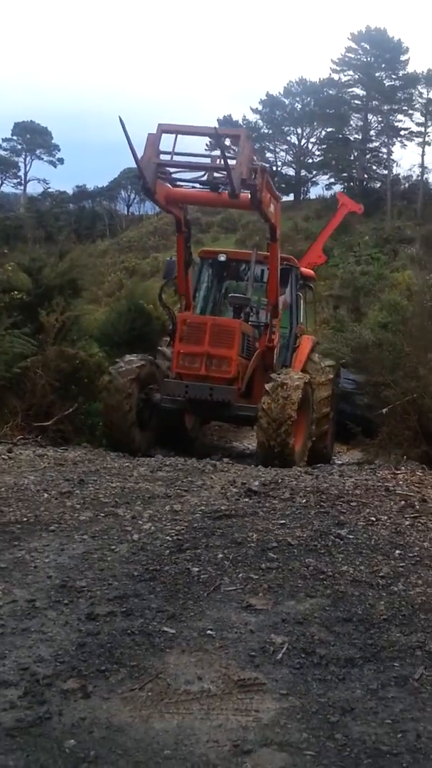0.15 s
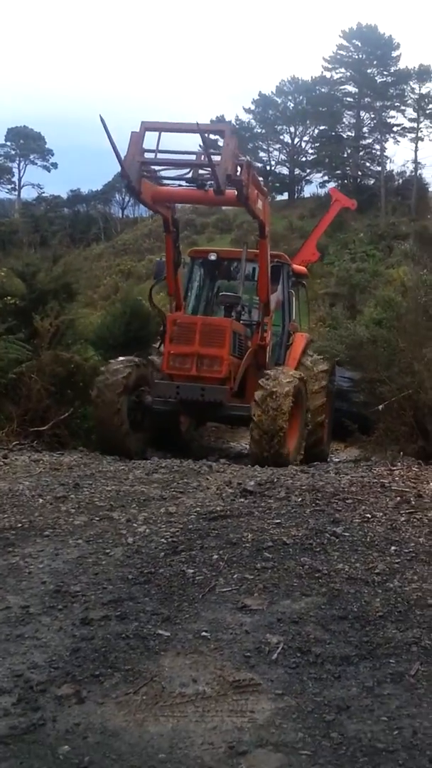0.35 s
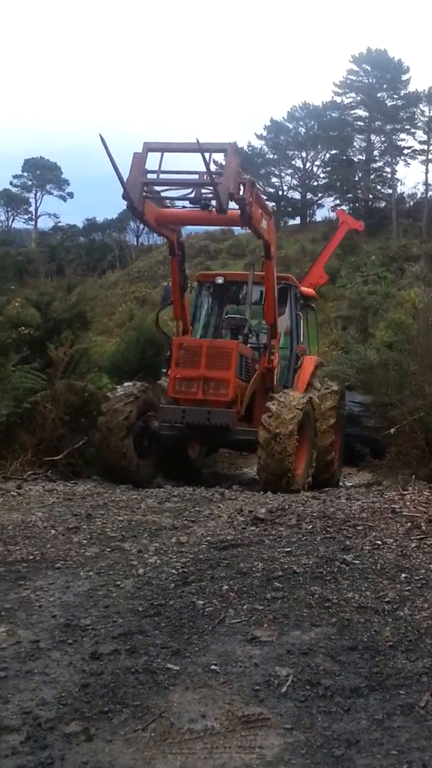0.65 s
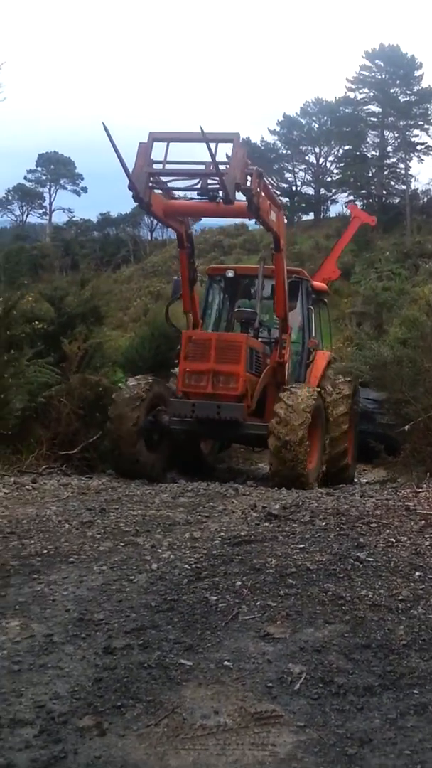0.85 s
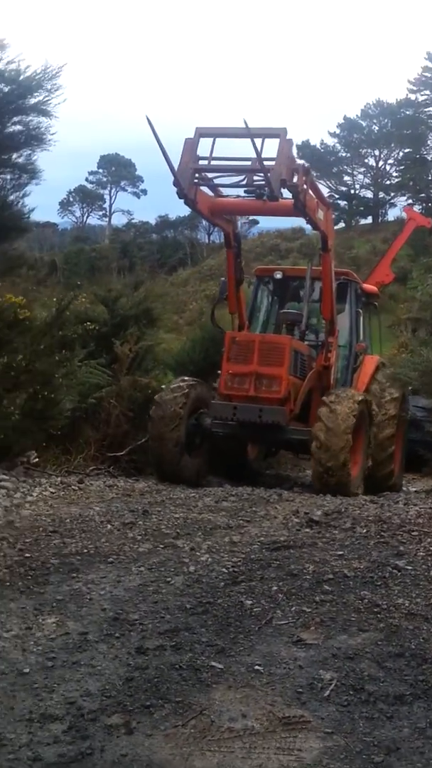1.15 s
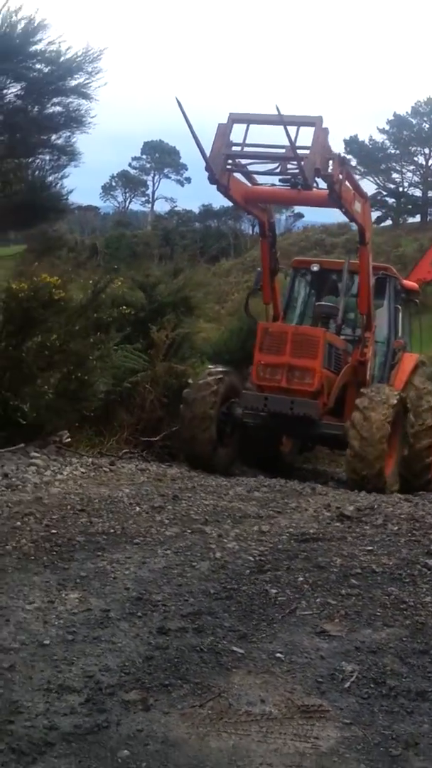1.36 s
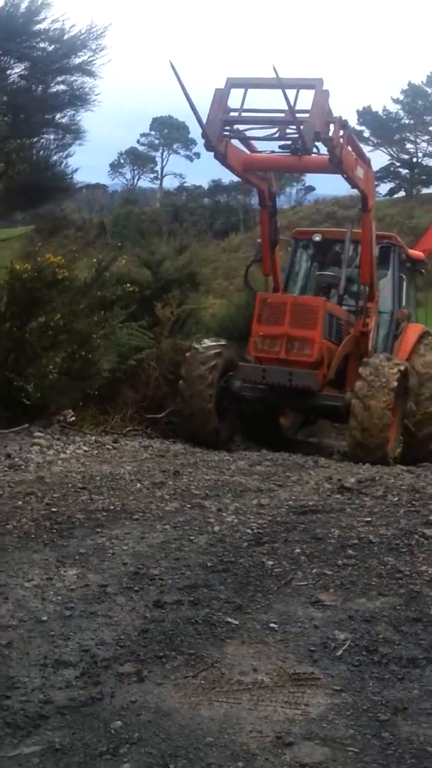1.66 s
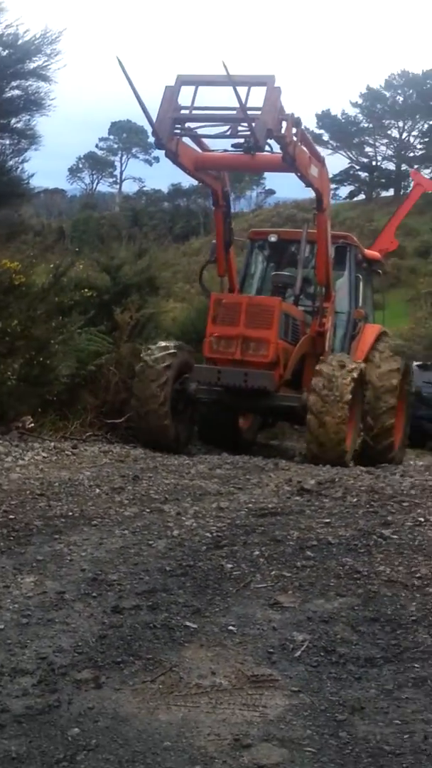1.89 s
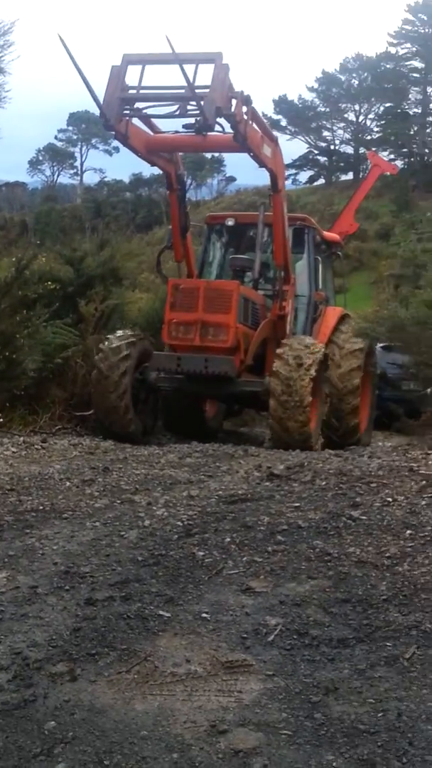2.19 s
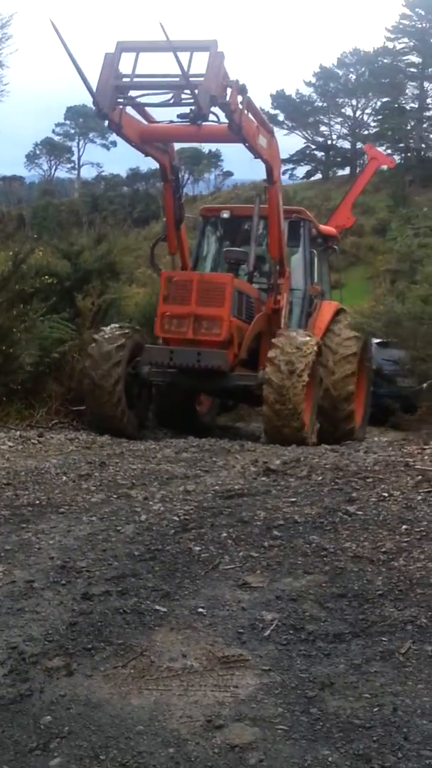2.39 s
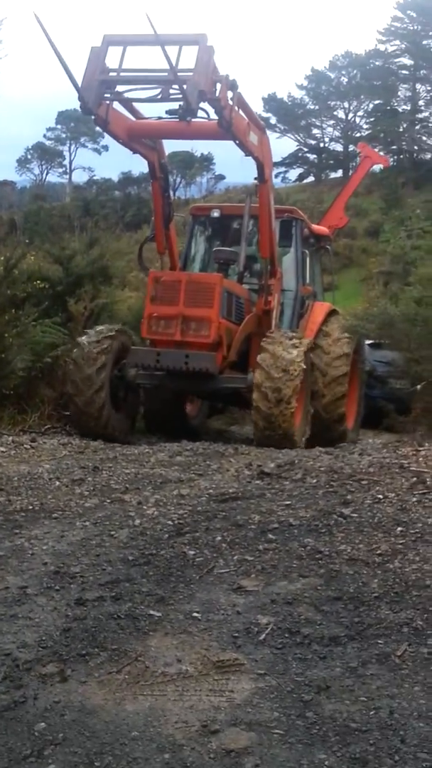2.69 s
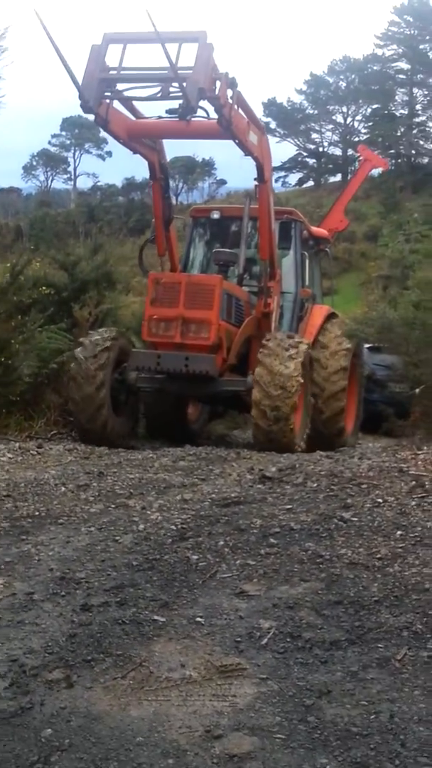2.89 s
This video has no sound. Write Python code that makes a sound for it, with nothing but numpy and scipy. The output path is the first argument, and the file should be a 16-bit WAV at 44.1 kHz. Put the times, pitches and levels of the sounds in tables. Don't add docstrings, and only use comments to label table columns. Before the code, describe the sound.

Continuous tractor engine rumble with fast, uneven chugging and metallic rattle, wavering slightly in strength but never revving up. One tiny dry click near the start; outdoors, dry, picked up by a small stereo device.

```python
import sys
import numpy as np
from scipy import signal
from scipy.fft import rfft, irfft, next_fast_len
from scipy.io import wavfile
from scipy.ndimage import uniform_filter1d

SR = 44100
rng = np.random.default_rng(int(sys.argv[2]) if len(sys.argv) > 2 else 0)


def transcribe(u):
    v = np.clip(np.atleast_2d(u).T, -1, 1)
    q = np.round(v * 32767).astype(np.int16)
    wavfile.write(sys.argv[1], SR, q)


def natural_amplitude(level_db):
    exponent = np.asarray(level_db, float) / 20
    return 10 ** exponent


N = 134064

# t/s, cycle rate f/Hz
CYCLE_RATE = [(0.0, 10.344), (0.234, 10.407), (0.468, 10.547), (0.702, 10.244), (0.935, 10.094),
              (1.169, 10.019), (1.403, 9.983), (1.637, 10.143), (1.871, 10.069), (2.105, 10.13),
              (2.338, 10.225), (2.572, 10.115), (2.806, 10.129), (3.04, 10.345)]
# t/s, level/dB
LOAD = [(0.0, -28), (0.27, -26), (0.51, -28.5), (0.97, -27), (1.11, -31), (1.24, -26), (1.42, -31),
        (1.45, -22.5), (1.5, -30), (1.54, -23), (1.62, -30.5), (2.16, -28.5), (2.36, -25.5), (2.37, -28),
        (2.45, -26), (2.52, -34.5), (2.53, -26.5), (3.04, -25.5)]
# t/s, level/dB
FUELLING = [(0, 1), (.15, 1.5), (.4, 3.5), (.55, -0.5), (.72, 0.5), (.84, 0.5), (.97, 1.5), (1.13, -2.5),
            (1.3, 1.2), (1.43, -1), (1.57, 1), (1.8, -4), (2.1, -2.5), (2.32, 1.5), (2.5, -3.5),
            (2.64, 2.5), (2.83, -2), (3.04, 3)]
# place in the cycle/1 (0 to 1), level/dB
LOW_PULSES = [(0.105, -35.4), (0.166, -41.6), (0.403, -32.0), (0.483, -45.1), (0.774, -37.8), (0.97, -26.2)]
BOX_PULSES = [(0.175, -36.4), (0.471, -34.3), (0.836, -35.8)]
MID_PULSES = [(0.009, -42.7), (0.228, -38.2), (0.366, -28.7), (0.505, -38.9), (0.629, -35.8),
              (0.753, -40.7), (0.916, -38.8)]
UPPER_PULSES = [(0.02, -45.4), (0.119, -45.0), (0.396, -36.8), (0.694, -45.0), (0.805, -37.8)]
TOP_PULSES = [(0.172, -38.3), (0.394, -34.0), (0.492, -41.1), (0.685, -39.1), (0.8, -48.3)]
# f/Hz, width/Hz
PIPE = [(208, 35), (245, 35), (300, 35), (435, 35), (555, 35)]
# trim level/dB, share of fuelling followed/1, pulse scatter/dB
DRIVE = [(.8, 1.05, 1.0), (.5, .8, 1.5), (.8, .95, 1.2), (1.5, .6, 1.5), (1.5, .6, 1.5)]
# multiple of the cycle rate/1, peak level/dB
TONES = [(5, -53.5), (10, -42), (15, -26.5), (35, -39)]
# f/Hz, density level/dB per Hz
ROAR = [(30, -48), (75, -34), (130, -22), (200, -8), (300, -6), (450, -5), (650, -6), (800, -30)]
# f/Hz, density level/dB per Hz
HISS = [(350, -23), (600, -3.5), (1500, -14.5), (2090, -11.5), (2600, -17.5), (4490, -22.5), (10700, -42),
        (15000, -52)]
# f/Hz, width/Hz, level/dB
BLOCK = [(595.6, 17, -37.5), (880, 94, -36.5), (1174, 80, -37.5), (1347, 52, -40), (1708, 170, -37.5),
         (2102, 96, -41), (4454, 270, -42.5), (3340, 29, -63)]
# t/s, peak level/dB
SNAPS = [
    (.229, -34),
    (.2355, -26),
    (.243, -36),
]
# f/Hz, likeness/1 (clipped to 0-1)
LIKENESS = [(60, 4), (300, 0.96), (900, 0.9), (1500, 0.57), (2200, 0.71), (3100, 0.31), (6500, -0.4),
            (8500, .05)]
# f/Hz, lag/rad
LAG = [(0, 0), (180, .1), (330, .42), (600, .05), (1000, .45), (1650, -.3), (2550, 2.7), (4500, 6.4),
       (6700, 9.4), (22050, 30)]
# f/Hz, level/dB
TILT = [(100, .6), (330, 1.5), (480, -1), (900, 1.3), (1500, -.8), (2000, 7.5), (2800, -.5), (9000, -5)]

NOISE_FOLLOWS = 1.1


def in_time(rows):
    return np.interp(np.arange(N) / SR, *np.transpose(rows))


def at_hz(points, hz):
    table_hz, values = np.transpose(points)
    return np.interp(np.log(hz), np.log(table_hz), values)


def rms_one(x):
    return x / np.sqrt(np.mean(x ** 2) + 1e-20)


def drift(rate):
    r = np.exp(-80 * np.pi * rate / SR)
    white = rng.standard_normal(N // 40 + 2002)
    slow = signal.lfilter([1], [1, -2 * r, r * r], white)[2000:]
    return np.interp(np.arange(N) / 40, np.arange(len(slow)), rms_one(slow))


def resonate(x, hz, width_hz):
    r = np.exp(-np.pi * width_hz / SR)
    poles = [1, -2 * r * np.cos(2 * np.pi * hz / SR), r * r]
    return signal.lfilter([(1 - r * r) / 2, 0, (r * r - 1) / 2], poles, x)


def banded_noise(spectrum, patchy_db, fast_db):
    out = 0
    edges = 30 * 2 ** np.arange(0, 9.1, 1 / 3)
    white = rng.standard_normal((2, N))
    for k, (low, high) in enumerate(zip(edges, edges[1:])):
        if not spectrum[0][0] < high < 1.3 * spectrum[-1][0]:
            continue
        band = signal.sosfilt(signal.butter(2, [low, high], "band", fs=SR, output="sos"), white[k % 2])
        level_db = at_hz(spectrum, np.sqrt(low * high))
        out = out + band * natural_amplitude(level_db + patchy_db * drift(1.12) + fast_db * drift(31))
    return rms_one(out)


def exhaust(turns, fuel_db):
    out = 0
    lead = SR // 10
    cycle = np.arange(-1, int(turns[-1]) + 1)[:, None]
    known_turns = np.r_[-lead * CYCLE_RATE[0][1] / SR, turns]
    known_samples = np.r_[0, lead + np.arange(N)]
    jitter_s = .0001
    tables = [LOW_PULSES, BOX_PULSES, MID_PULSES, UPPER_PULSES, TOP_PULSES]
    for pulses, (hz, width_hz), (trim_db, follows, scatter_db) in zip(tables, PIPE, DRIVE):
        place, db = np.transpose(pulses)
        time_luck, level_luck = rng.standard_normal((2, len(cycle), len(place)))
        at = np.interp(cycle + place, known_turns, known_samples) + jitter_s * SR * time_luck
        clicks = np.full(lead + N, 1e-18)
        clicks[np.clip(at, 0, lead + N - 1).astype(int)] += natural_amplitude(db + scatter_db * level_luck) * SR / 20
        clicks[-1] = 0
        ringing = resonate(resonate(clicks, hz, width_hz), hz, width_hz)[lead:]
        out = out + ringing * natural_amplitude(trim_db + follows * fuel_db)
    return signal.sosfilt(signal.butter(6, 130, "high", fs=SR, output="sos"), out)


def firing_tones(turns, load_db):
    wobble_db, place, follows = 1.28, .0275, 0.82
    out = 0
    for multiple, db in TONES:
        wave = np.cos(2 * np.pi * round(multiple) * (turns - place))
        out = out + natural_amplitude(db + wobble_db * drift(7)) * wave
    return natural_amplitude(follows * load_db) * out


def panel_hum(turns):
    level_db, fade_db_per_s, fade_start_s = -23, 17.5, .45
    fade_s = np.maximum(np.arange(N) / SR - fade_start_s, 0)
    return natural_amplitude(level_db - fade_db_per_s * fade_s) * np.sin(2 * np.pi * 26 * turns)


def roar(load_db):
    return natural_amplitude(-30 + 1.0 * load_db) * banded_noise(ROAR, patchy_db=-0.5, fast_db=-0.3)


def clatter(turns, load_db):
    knocks_per_s, hiss_db, gate_db = 830, -27, 0.5
    gate = gate_db * np.cos(2 * np.pi * (5 * turns - .3))
    throb = natural_amplitude(NOISE_FOLLOWS * load_db + gate + .7 * drift(25))
    sizes = natural_amplitude(2.4 * np.minimum(rng.exponential(1, N), 4))
    knocks = sizes * rng.choice([-1, 1], N) * (rng.random(N) < knocks_per_s / SR)
    dealt = rng.integers(0, 2, N)
    rings = 0
    for k, (hz, width_hz, db) in enumerate(BLOCK):
        struck = knocks * (dealt == k % 2) + 1e-18
        rings = rings + natural_amplitude(db) * rms_one(resonate(resonate(struck, hz, width_hz), hz, 2 * width_hz))
    return throb * (rings + natural_amplitude(hiss_db) * banded_noise(HISS, patchy_db=1.14, fast_db=-2.64))


def snaps():
    out = np.zeros(N)
    decay = np.exp(-np.arange(200) / 50)
    for s, db in SNAPS:
        start = int(s * SR)
        out[start:start + 200] = natural_amplitude(db) * rng.standard_normal(200) * decay
    return signal.sosfilt(signal.butter(2, 5000, "high", fs=SR, output="sos"), out)


def ports(direct, noisy, swell):
    scatter_s = .098
    size = next_fast_len(N + 8192)
    hz = np.fft.rfftfreq(size, 1 / SR) + 1
    alike = np.clip(at_hz(LIKENESS, hz), 0, 1)
    tilt = natural_amplitude(at_hz(TILT, hz) / 2)
    shared = rfft(direct, size) + np.sqrt(alike) * rfft(noisy, size)
    scattered = []
    for sign in (-1, 1):
        shifted = swell * np.roll(noisy / swell, int(sign * scatter_s * SR))
        scattered.append(np.sqrt(1 - alike) * rfft(shifted, size))
    lag = np.exp(-1j * np.interp(hz, *np.transpose(LAG)))
    left = (shared + scattered[0]) * tilt * lag
    right = (shared + scattered[1]) / tilt
    return np.array([irfft(left, size)[:N], irfft(right, size)[:N]])


def scene():
    turns = np.cumsum(in_time(CYCLE_RATE)) / SR
    load_db = in_time(LOAD)
    load_db = uniform_filter1d(load_db - load_db.mean(), size=2500)
    pulsed = exhaust(turns, in_time(FUELLING))
    tonal = firing_tones(turns, load_db) + panel_hum(turns)
    noisy = roar(load_db) + clatter(turns, load_db)
    return ports(pulsed + tonal + snaps(), noisy, natural_amplitude(NOISE_FOLLOWS * load_db))


def top_cut(x):
    return signal.sosfilt(signal.butter(12, 14800, fs=SR, output="sos"), x)


def record(dry):
    mix = signal.sosfilt(signal.cheby2(10, 60, 16000, fs=SR, output="sos"), dry)
    return top_cut(mix)


dry = scene()
out = record(dry)
transcribe(out)
```